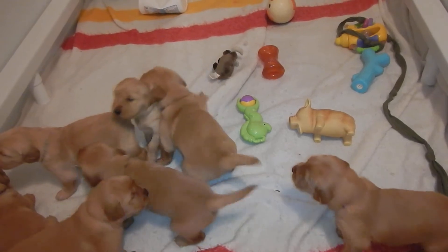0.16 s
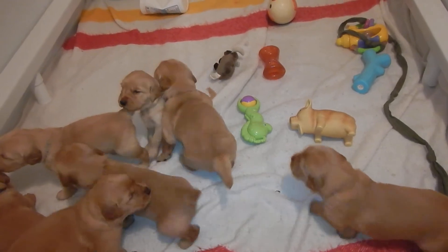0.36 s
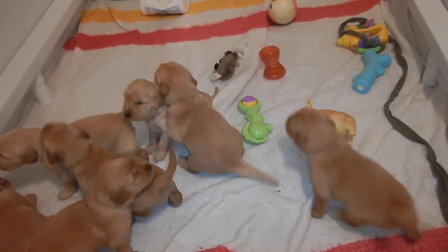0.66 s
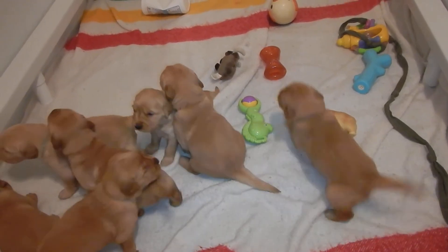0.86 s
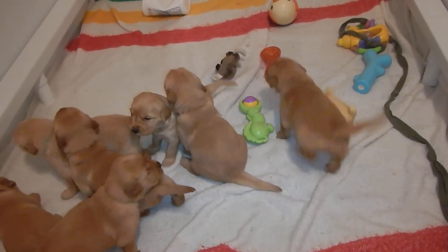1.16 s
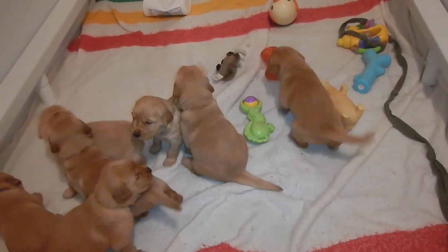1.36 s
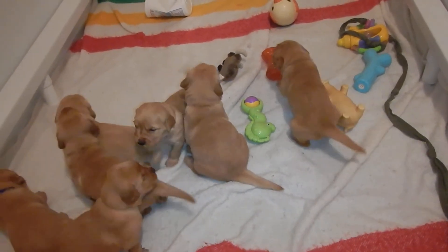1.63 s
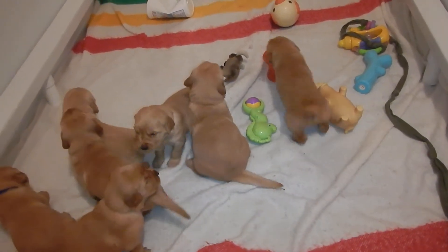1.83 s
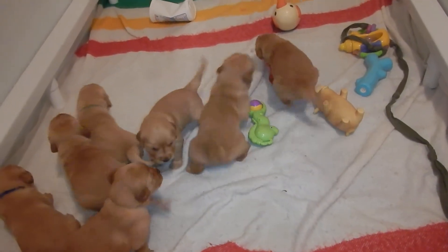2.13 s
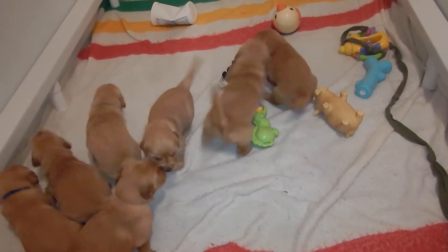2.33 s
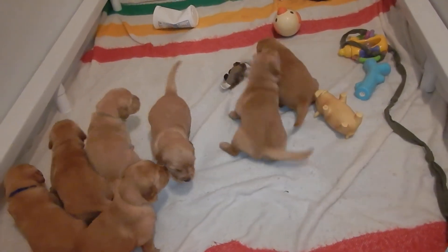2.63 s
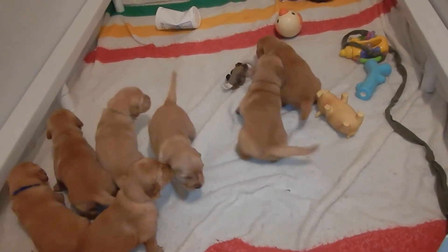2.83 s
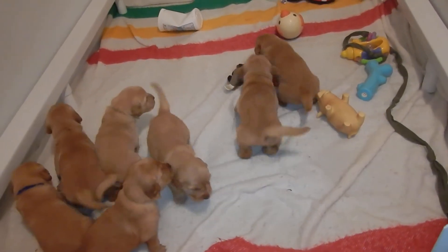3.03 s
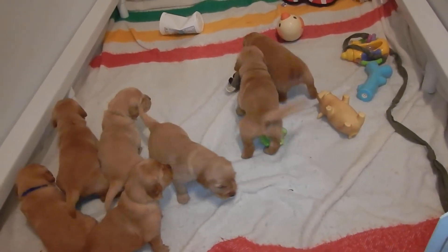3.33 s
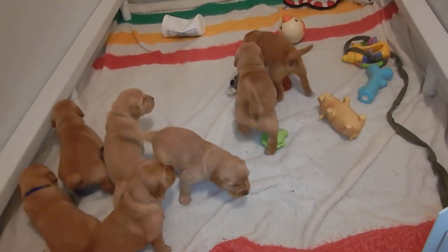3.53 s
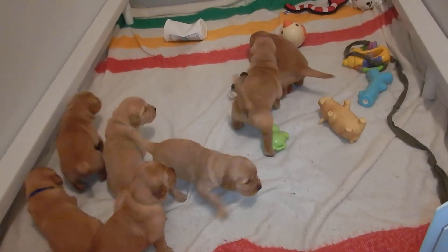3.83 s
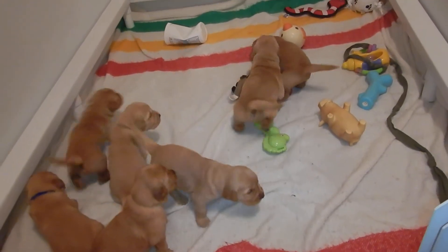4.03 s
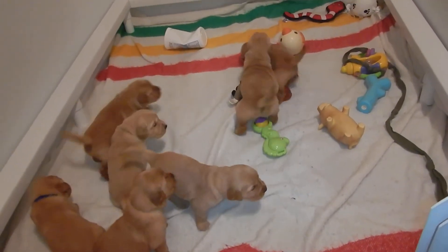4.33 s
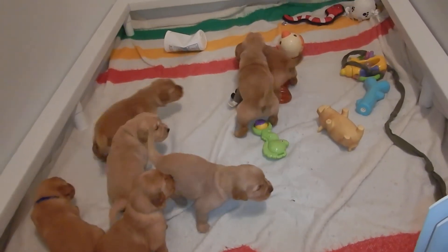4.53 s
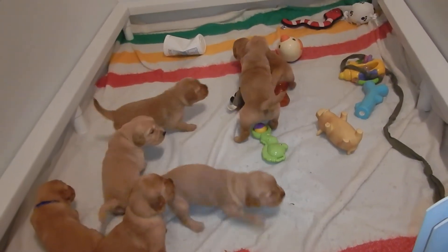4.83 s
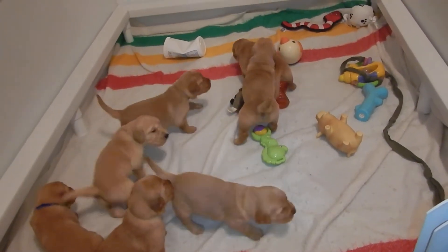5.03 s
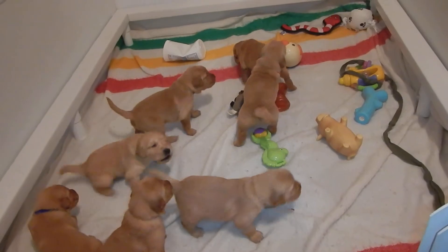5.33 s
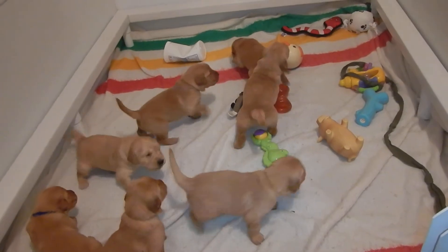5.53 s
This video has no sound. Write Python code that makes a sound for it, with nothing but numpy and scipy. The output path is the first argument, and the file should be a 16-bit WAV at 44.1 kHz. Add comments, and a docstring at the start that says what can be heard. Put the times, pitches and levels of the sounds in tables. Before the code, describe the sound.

A puppy gives a sharp cracking double yap, a low throbbing growl and a final yap, amid soft paw pats and toy clicks indoors.

```python
"""A puppy gives a double yap, a long throbbing growl and a last yap: stacked tones and breath shaped by a throat.
Others whine, whimper, grunt and growl faintly, on a blanket in a boarded pen in a small room with a short noise tail.
Claws and teeth tick on a hard toy (ringing tones and cracks); paws pat (noise bursts); bodies thump (low tones).
Coloured noise makes a dull, a bright and a rumbling background, with a steady low house hum below.
A small camera with two microphone ports and gain control listens from above."""
import sys
import numpy as np
from scipy import signal
from scipy.fft import rfft, irfft, next_fast_len
from scipy.io import wavfile
from scipy.ndimage import uniform_filter1d, minimum_filter1d

SR = 44100
rng = np.random.default_rng(int(sys.argv[2]) if len(sys.argv) > 2 else 0)


def dump(signal):
    """Clip the signal to [-1, 1] and save it as 16-bit WAV at the path in sys.argv[1]."""
    limited = np.clip(np.atleast_2d(signal).T, -1, 1)
    pcm = np.round(limited * 32767).astype(np.int16)
    wavfile.write(sys.argv[1], SR, pcm)


N = 250527


def from_db(db):
    """Turns decibels into a plain loudness factor."""
    return 10 ** (np.asarray(db) / 20)


def rms_one(x):
    """Scales a sound to an average (RMS) strength of 1."""
    return x / np.sqrt(np.mean(x ** 2) + 1e-20)


def at_hz(points, hz):
    """Reads a table between its points, with frequency spaced by ratio as the ear hears it."""
    points = np.array([p for p in points if p[0] > 0])
    return np.interp(np.log(np.maximum(hz, 1)), np.log(points[:, 0]), points[:, 1])


def drift(rate_hz, size):
    """Makes a slow random wander: noise smoothed twice, with a spread of 1."""
    r = np.exp(-2 * np.pi * rate_hz / SR)
    noise = rng.standard_normal(size + SR)
    settled = signal.lfilter([1], [1, -2 * r, r * r], noise)[SR:]
    return rms_one(settled)


def coloured(x, spectrum):
    """Makes each frequency louder or softer by a dB table."""
    size = next_fast_len(x.shape[-1])
    gain = from_db(at_hz(spectrum, np.fft.rfftfreq(size, 1 / SR)))
    return irfft(rfft(x, size) * gain, size)[..., :x.shape[-1]]


def ring(clicks, hz, t60):
    """Rings like a struck object: a unit click starts a sine of about height 1 that fades 60 dB in t60 seconds."""
    r, w = from_db(-60 / (t60 * SR)), 2 * np.pi * hz / SR
    return signal.lfilter([0, np.sin(w)], [1, -2 * r * np.cos(w), r * r], clicks + 1e-18)


# how alike left and right are: (f/Hz, likeness 0-1)
LEFT_RIGHT_LIKENESS = [(60, 0.93), (160, 0.83), (420, 0.85), (1090, 0.83), (2870, 0.19), (7560, 0.088)]


def murmur(spectrum, level_db, patchy_db):
    """Stereo noise of a given colour: nearly alike on both sides in the bass, wandering in level."""
    hz = np.geomspace(20, 16000, 30)
    alike = np.clip(at_hz(LEFT_RIGHT_LIKENESS, hz), 0, .999)
    mid, side = coloured(rng.standard_normal((2, N)), spectrum)
    side_db = 10 * np.log10((1 - alike) / (1 + alike))
    side = coloured(side, list(zip(hz, side_db)))
    stereo = rms_one(mid + side * [[1], [-1]])
    return from_db(level_db + patchy_db * drift(12, N)) * stereo


# colour of the low rumble: (f/Hz, relative level/dB per Hz)
RUMBLE_COLOUR = [(12, -27.5), (20, -11.5), (70, 3.5), (124, -6), (146, -8.5), (200, -4), (260, -31.5),
                 (440, -120)]


def rumble():
    """A low background rumble made of bass noise."""
    return murmur(RUMBLE_COLOUR, -52.5, patchy_db=1.0)


# colours of the dull and the bright background noise: (f/Hz, relative level/dB per Hz)
DULL_COLOUR = [(120, -41), (200, -9), (242, 0.5), (400, -10.5), (633, -11.5), (1000, -26), (1300, -76.5),
               (2200, -120)]
BRIGHT_COLOUR = [(590, -26.5), (1000, -1.5), (1510, -6.5), (2270, -9), (2520, -2.5), (2790, -9.5),
                 (3820, -18.5), (5270, -7.5), (6970, -11), (8010, -17), (10400, -41.5), (17600, -120)]
# background noise levels over time: (t/s, dull level/dB, bright level/dB), before the small wander
NOISE_LEVELS = [(0, -57.5, -61.5), (.55, -50.5, -63), (.86, -54.5, -59.5), (.93, -57.5, -55),
                (.99, -54, -58.5), (1.5, -54.5, -60), (2.999, -52.5, -57), (4.1, -55, -61), (4.6, -54, -57),
                (5.68, -56, -67)]


def background_noise():
    """Dull and bright background noise, each rising and falling over time by its own curve."""
    s, *levels = np.transpose(NOISE_LEVELS)
    dull_db, bright_db = [np.interp(np.arange(N) / SR, s, c) for c in levels]
    dull = murmur(DULL_COLOUR, dull_db, patchy_db=-0.3)
    return dull + murmur(BRIGHT_COLOUR, bright_db, patchy_db=1.3)


def house_hum():
    """The house hums: one low sine at 119 Hz with a slightly wandering level."""
    return from_db(-53 + 0.5 * drift(9, N)) * np.sin(2 * np.pi * 119 * np.arange(N) / SR)


def soft_notes(rows):
    """Short soft notes: a tone and its double, sagging a little in pitch."""
    out = np.zeros(N)
    for s, peak_db, hz, length, second_db in rows:
        size = int(length * SR)
        pitch = hz * np.linspace(1.008, .992, size) * (1 + 0.027 * drift(90, size))
        phase = 2 * np.pi * np.cumsum(pitch) / SR
        note = np.sin(phase) + from_db(second_db) * np.sin(2 * phase)
        swell = np.hanning(size) ** 0.15
        out[int(s * SR):][:size] += from_db(peak_db) * swell * note
    return out


# short soft notes: the others' whimpers and grunts, and in one row the hard toy ringing near 1 kHz
# (t/s, first tone's peak level/dB, f/Hz, length/s, second tone's level/dB relative to the first)
SOFT_NOTES = [(.01, -62, 1220, 0.04, -24.5), (2.346, -29, 168.3, 0.041, -17),
              (3.944, -57.5, 946, 0.044, -4), (4.17, -38, 204, 0.065, -23), (4.178, -57, 1068, 0.026, 3.5),
              (4.354, -50.5, 1000, 0.039, 0), (4.811, -48, 869, 0.052, -15.5),
              (4.964, -38, 225.5, 0.052, -18.5)]
TOY_ROW = 5   # the row of the toy, counted from 0


def whimpers():
    """The other puppies whimper and grunt in short soft notes."""
    return soft_notes([row for k, row in enumerate(SOFT_NOTES) if k != TOY_ROW])


def room(x):
    """The room's echoes blur into fading noise, alike in the bass and different at each port in the treble."""
    t = np.arange(SR // 2) / SR
    fade = from_db(-60 * t / 0.3) * (t > .004)   # 60 dB in 0.3 s, after a short gap
    mid, side = rng.standard_normal((2, len(t))) * fade
    side = signal.sosfilt(signal.butter(1, 3000, "high", fs=SR, output="sos"), side)
    band = signal.butter(1, [550, 5000], "band", fs=SR, output="sos")
    tail = signal.sosfilt(band, mid + 0.29 * side * [[1], [-1]])
    dull = signal.sosfilt(signal.butter(2, 2500, fs=SR, output="sos"), tail)
    tail = dull + (tail - dull) * from_db(-60 * t / 0.86)   # the treble dies sooner
    tail /= np.sqrt(np.sum(tail ** 2) / 2)
    return signal.fftconvolve(x[None], tail, axes=1)[:, :N]


# bodies thumping the boards: (t/s, push level/dB before its rise and fade, f/Hz)
BOARD_THUMPS = [(0.227, -23, 91.5), (0.669, -35.5, 76), (0.877, -35, 74), (2.31, -27, 110.3),
                (3.361, -31.5, 79), (4.393, -37.5, 74.4), (4.586, -35.5, 93.3)]


def thumps():
    """A body pushes the boards softly: one low tone that rises gently, fades and wavers in phase."""
    out, t = np.zeros(N + SR), np.arange(SR // 2) / SR
    rise_s, t60_s = 0.0049, 0.22
    for s, push_db, hz in BOARD_THUMPS:
        push = (1 - np.exp(-t / rise_s)) ** 2 * from_db(-60 * t / t60_s)
        tone = np.sin(2 * np.pi * hz * t + 1.33 * drift(49, len(t)))
        out[int(s * SR):][:len(t)] += from_db(push_db) * push * tone
    return out[:N]


# paws patting and scuffing the blanket: (t/s, peak level/dB, centre f/Hz, decay of the noise/s)
PAW_PATS = [(0.3386, -40, 1540, 0.0022), (0.469, -43.5, 1220, 0.0057), (.7098, -49, 1120, 0.0038),
            (0.772, -47.5, 1510, .004), (0.919, -47, 1740, 0.016), (1.045, -43, 1240, 0.0018),
            (1.2384, -43.5, 1080, 0.0067), (1.292, -46, 1320, 0.0036), (4.018, -41, 5830, 0.022),
            (4.131, -40.5, 6100, 0.0089), (4.1606, -41.5, 6860, 0.022), (4.6318, -34.5, 6000, 0.00089),
            (4.964, -48, 1510, .008), (5.055, -50, 5620, 0.00374)]


def pats():
    """A paw meets the blanket: a short noise burst passes a wide resonance twice."""
    out, t = np.zeros(N + SR), np.arange(SR // 2) / SR
    for s, peak_db, hz, decay in PAW_PATS:
        burst = rng.standard_normal(len(t)) * np.exp(-t / decay)
        pat = ring(ring(burst, hz, 4 / hz), hz, 4 / hz)
        out[int(s * SR):][:len(t)] += from_db(peak_db) * pat / np.abs(pat).max()
    return out[:N]


# how the throat colours the voice, mouth shut and mouth open: (f/Hz, relative level/dB)
SHUT_THROAT = [(88, -38.5), (150, 10), (265, 15), (400, 0.5), (577, -2), (671, -6), (861, -6),
               (1160, -22.5), (1340, -28.5), (1600, -25.5), (1950, -17.5), (2620, -73.5), (4110, -40.5),
               (4620, -66), (6660, -42.5), (8000, -52)]
OPEN_THROAT = [(180, -61), (450, -36), (900, -23), (1100, -17), (1340, -0.5), (1560, -9.5), (1850, -8.5),
               (2200, -4), (2600, -16), (3400, -22), (3880, -25.5), (4180, -18), (4600, -17.5), (6160, -12),
               (6970, -15), (8000, -45.5)]
# the voice's colour follows its pitch: low is shut-mouthed and throbbing, high is open
# (f/Hz, mouth opening 0-1, throb depth 0-1 before each call's share, breath level/dB,
#  period doubling 0-1, jitter as a share of pitch)
VOICE_REGISTERS = [(210, 0.08, 0.58, -7.5, 0.4, 0.021), (304, 0.24, .95, -17, .25, .014),
                   (381.6, 0.53, 0.5, -27, .05, 0.0082), (850, 0.99, 0.21, -17.5, .06, .013)]
# at the top of each yap the voice cracks: (start t/s, end t/s)
VOICE_CRACKS = [(1.713, 1.782), (2.045, 2.145), (5.24, 5.302)]
CRACK_EDGE_S, CRACK_BREATH_DB, CRACK_DOUBLING, CRACK_JITTER = 0.0082, -6.5, 1.1, .028
THROB_HZ, THROB_PEAK_S = 27.9, 2.747   # the soft palate flutters
THROB_BEND = -.025   # the pitch sinks by this share of the throb depth at each throb's peak
OTHER_THROB = .75   # share of the throb depth kept in all calls but the main growl


def voice(rows, throb_share, count=60):
    """Vocal fold tones and breath puffs pass a throat between shut and open, while the palate throbs."""
    s, *columns = np.transpose(rows)
    at = np.arange(int(s[0] * SR), min(int(s[-1] * SR), N))
    t = at / SR
    pitch, level_db = [np.interp(t, s, c) for c in columns]

    cracked = sum(np.clip(np.minimum(t - start, end - t) / CRACK_EDGE_S + .5, 0, 1)
                  for start, end in VOICE_CRACKS)
    steps_hz, *laws = np.transpose(VOICE_REGISTERS)
    mouth, throb = [np.clip(np.interp(pitch, steps_hz, law), 0, 1) for law in laws[:2]]
    rough_values = (CRACK_BREATH_DB, CRACK_DOUBLING, CRACK_JITTER)
    breath_db, doubling, jitter = [np.interp(pitch, steps_hz, law) * (1 - cracked) + rough * cracked
                                   for law, rough in zip(laws[2:], rough_values)]

    throb = throb * throb_share
    flutter = np.cos(2 * np.pi * THROB_HZ * (t - THROB_PEAK_S) + .2 * drift(3.5, len(at)))
    pitch = pitch * (1 + jitter * drift(150, len(at)) + THROB_BEND * throb * flutter)
    turns = np.cumsum(pitch) / SR   # cycles of the folds so far

    tone = np.zeros(len(at))
    for order in np.arange(1, count + 1) / 2:   # half orders sound when strong and weak cycles alternate
        hz = order * pitch
        throat_db = mouth * at_hz(OPEN_THROAT, hz) + (1 - mouth) * at_hz(SHUT_THROAT, hz)
        share = 1 if order % 1 == 0 else doubling
        waver_db = np.interp(at, at[::350], rng.normal(0, 2.0, len(at[::350])))   # each tone wavers alone
        height = share * from_db(throat_db + waver_db) * (hz < 8500)
        tone += height * np.cos(2 * np.pi * order * turns + .7 * order ** 2)
    tone /= np.sqrt(uniform_filter1d(tone ** 2, size=900) + 1e-12)   # even out, so the level curve rules

    puffs = rng.standard_normal(len(at)) * (1 + 2.8 * np.cos(2 * np.pi * turns))   # breath pulses each cycle
    open_breath = mouth * rms_one(coloured(puffs, OPEN_THROAT))
    shut_breath = (1 - mouth) ** 2 * rms_one(coloured(puffs, SHUT_THROAT))
    breath = open_breath + shut_breath

    call = (tone + from_db(breath_db) * breath) * (1 - throb * (1 - flutter) / 2)
    call *= from_db(1.2 * drift(70, len(at)))   # slight unsteadiness
    out = np.zeros(N)
    out[at] = from_db(level_db) * call * np.minimum(1, (at - at[0]) / 400)   # fade in softly
    return out


# another puppy, faint: (t/s, f/Hz, level/dB before throb and waver)
FAINT_WHINE = [(1.405, 421, -72), (1.44, 421, -65), (1.58, 434, -62), (1.64, 443, -56)]


def whine():
    """Another puppy whines faintly, with the same kind of voice."""
    return voice(FAINT_WHINE, OTHER_THROB)


# the double yap: (t/s, f/Hz, level/dB before throb and waver)
DOUBLE_YAP = [(1.54, 210, -47.5), (1.585, 224.6, -37), (1.644, 252.5, -26), (1.662, 418, -17),
              (1.69, 773.7, -9.5), (1.715, 923.5, -3.5), (1.765, 882, -4.5), (1.80, 630, -13),
              (1.86, 441.8, -14.5), (1.93, 382.4, -21.5), (1.985, 401.5, -17), (2.03, 638.2, -13.5),
              (2.065, 837, -7), (2.105, 873, -9), (2.146, 631.6, -13.5), (2.19, 407.3, -29.5),
              (2.25, 280.4, -33.5), (2.3, 248.8, -47)]


def double_yap():
    """Two quick yaps: pitch and level leap up twice, and the voice cracks at each top."""
    return voice(DOUBLE_YAP, OTHER_THROB)


# claws and teeth on a hard toy: (t/s, ring level/dB, crack level/dB, length of the contact/s)
TOY_CONTACTS = [(2.509, -32, -53, .012), (2.574, -26.5, -31, .012), (2.631, -37.5, -54, 0.0072),
                (3.461, -51.5, -39, .006), (3.836, -62, -65, .004), (4.1109, -48, -52, .003),
                (4.3528, -37.5, -32.5, 0.00209)]
# the toy's ringing tones: (f/Hz, level/dB added to the ring level, time to fade 60 dB/s)
TOY_TONES = [(1030, -20, .1), (1750, -8, .008), (1950, -7, .025), (2160, -2, .08), (2230, -7, .03),
             (2750, -6, .022), (3670, -14, .012), (4700, -9, .008), (5400, -7, .012)]


def ticks():
    """Each contact is a few small slips that strike the toy's tones unevenly, plus a dry noisy crack."""
    slips = 5
    s, ring_db, crack_db, length = np.transpose(TOY_CONTACTS)
    later = rng.random((len(s), slips)) * (np.arange(slips) > 0)   # the first slip comes at once
    at = ((s[:, None] + length[:, None] * later) * SR).astype(int)
    spread_db = rng.normal(0, 2.4, (len(s), slips, len(TOY_TONES)))
    out, clicks = np.zeros(N), np.zeros(N)
    for k, (hz, level_db, t60) in enumerate(TOY_TONES):
        clicks[at] = from_db(ring_db[:, None] + level_db + spread_db[..., k])
        out += ring(clicks, hz, t60)
    clicks[at] = from_db(crack_db[:, None] - 16 * later)   # later slips crack more softly
    fading = signal.lfilter([1], [1, -np.exp(-1 / (.003 * SR))], clicks)
    crack = fading * rng.standard_normal(N)
    # colour of the crack: (f/Hz, level/dB)
    out += coloured(crack, [(1000, -10), (2000, 9.5), (2900, 5), (3900, -1.5), (5500, 4), (8000, -9)])
    return signal.sosfilt(signal.butter(2, [1000, 8000], "band", fs=SR, output="sos"), out)


# the long growl: (t/s, f/Hz, level/dB before throb and waver)
LONG_GROWL = [(2.57, 202.2, -41.5), (2.682, 227.8, -30.5), (2.734, 268.8, -31.5), (2.86, 277.8, -26.5),
              (2.986, 263.8, -33.5), (3.044, 281.5, -27.5), (3.17, 289.3, -25), (3.29, 256.4, -32),
              (3.45, 244.9, -32.5), (3.52, 221, -33), (3.58, 216, -75)]


def growl():
    """A low, mostly shut-mouthed call, throbbing as the soft palate flutters."""
    return voice(LONG_GROWL, 0.86)


# another puppy, steadier: (t/s, f/Hz, level/dB before throb and waver)
SECOND_GROWL = [(2.62, 220, -56), (2.72, 222, -42), (2.9, 224, -41), (3.1, 226, -45), (3.45, 226, -45),
                (3.56, 220, -65)]


def low_growl():
    """Another puppy growls along with fewer tones and a weaker throb."""
    return voice(SECOND_GROWL, OTHER_THROB, count=16)


def toy_ring():
    """The hard toy rings briefly near 1 kHz: one short soft note."""
    return soft_notes([SOFT_NOTES[TOY_ROW]])


# the last yap: (t/s, f/Hz, level/dB before throb and waver)
FINAL_YAP = [(5.165, 298.2, -49), (5.182, 426.8, -21.5), (5.197, 563.6, -8.5), (5.21, 754.6, -5.5),
             (5.226, 875.5, -7), (5.257, 914.2, -1), (5.298, 878, -6), (5.32, 750.7, -12.5),
             (5.335, 648.3, -10.5), (5.355, 432.5, -19), (5.391, 307.6, -29), (5.5, 258.1, -31),
             (5.599, 281.7, -28.5), (5.68, 245, -36.5)]


def last_yap():
    """One more yap whose voice cracks at the top, then trails off low."""
    return voice(FINAL_YAP, OTHER_THROB)


def scene():
    """Adds all sources in the pen, their room tail and the background."""
    calls = growl() + low_growl() + double_yap() + last_yap() + whine() + whimpers()
    clear = calls + toy_ring()   # these reach the room at full strength
    contacts = ticks() + pats() + thumps()
    muffled = from_db(-7) * contacts   # the blanket swallows part of what they send into the room
    echoes = from_db(-6) * room(clear + muffled)
    background = rumble() + background_noise() + house_hum()
    return clear + contacts + echoes + background


# loudness difference between the ports: (f/Hz, left minus right level/dB)
PORT_LEVELS = [(100, .2), (1000, .1), (2500, -.3), (4000, 1.5), (5000, 3.5), (6000, 4.5), (7500, 3)]
# timing difference between the ports: (f/Hz, phase by which left leads/radians)
PORT_LEADS = [(0, 0), (3450, 0.38), (3700, 0.6), (5600, 1), (5940, 1.24), (6980, 0.95), (7240, 1.7),
              (7750, 5.5)]
NOTCH_HZ, NOTCH_WIDTH_HZ = 2515, 260
DUCK_ABOVE_DB, DUCK_SHARE = -23, 0.61   # threshold, and share of the excess that is taken away
DUCK_ATTACK_S, DUCK_HOLD_S, DUCK_RELEASE_DB_PER_S = 0.018, .12, 39   # release: fall of the followed level


def record(dry):
    """The ports differ, the housing cancels a narrow band, gain control ducks, peaks round off, the top is cut."""
    size = next_fast_len(N + SR)
    hz = np.fft.rfftfreq(size, 1 / SR)
    balance = at_hz(PORT_LEVELS, hz) * np.log(10) / 20
    lead = np.interp(hz, *np.transpose(PORT_LEADS))
    half = (balance + 1j * lead) / 2   # each port takes half of the difference
    x = irfft(rfft(dry, size) * np.exp(half * [[1], [-1]]), size)[:, :N]
    x = signal.lfilter(*signal.iirnotch(NOTCH_HZ, NOTCH_HZ / NOTCH_WIDTH_HZ, fs=SR), x)
    x = signal.sosfilt(signal.butter(8, 7600, fs=SR, output="sos"), x)
    x = x + from_db(-78) * rng.standard_normal(x.shape)   # hiss

    # gain control: follow the level, hold it, let it fall slowly, turn down what exceeds the threshold
    power = uniform_filter1d(np.mean(x ** 2, axis=0), size=441)
    level_db = 10 * np.log10(power + 1e-12)
    hold = int(DUCK_HOLD_S * SR)
    held_db = -minimum_filter1d(-level_db, size=hold, origin=(hold - 1) // 2)
    ramp_db = DUCK_RELEASE_DB_PER_S * np.arange(N) / SR
    followed_db = np.maximum.accumulate(held_db + ramp_db) - ramp_db
    over_db = np.maximum(followed_db - DUCK_ABOVE_DB, 0)
    attack = np.exp(-1 / (DUCK_ATTACK_S * SR))
    x = x * from_db(-DUCK_SHARE * signal.lfilter([1 - attack], [1, -attack], over_db))

    x = x / (1 + (x / .95) ** 8) ** (1 / 8)   # the loudest peaks are rounded
    return signal.sosfilt(signal.cheby2(12, 60, 15750, fs=SR, output="sos"), x)   # 60 dB down from 15750 Hz


dry = scene()
out = record(dry)
dump(out)
```